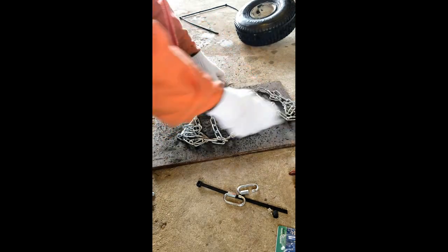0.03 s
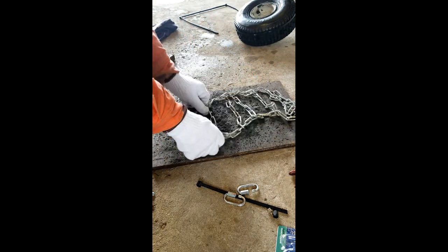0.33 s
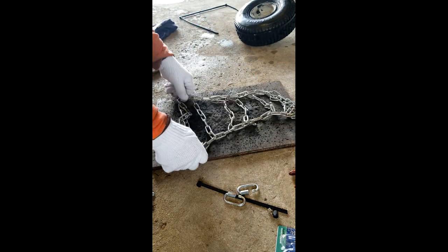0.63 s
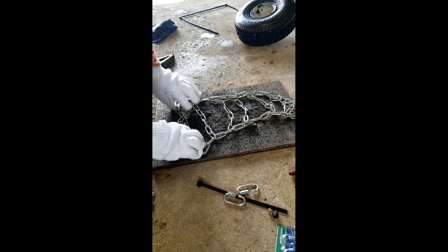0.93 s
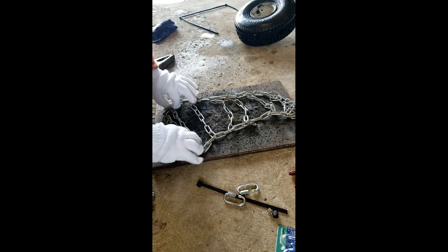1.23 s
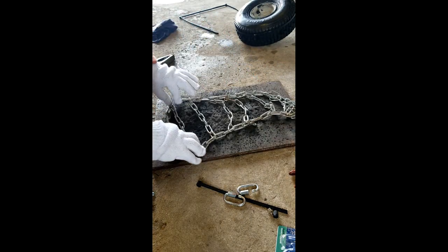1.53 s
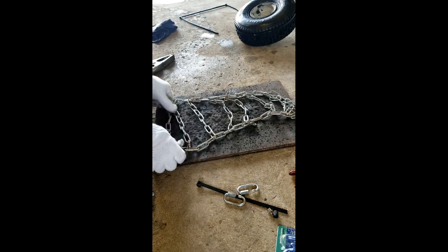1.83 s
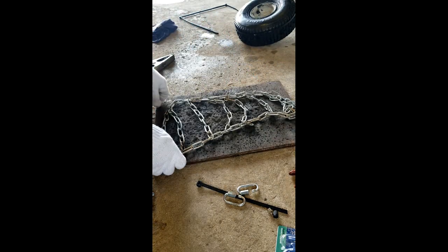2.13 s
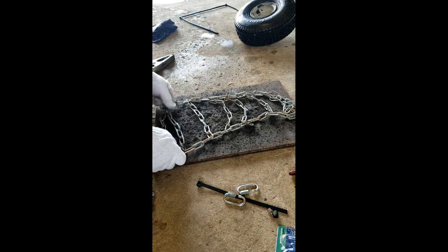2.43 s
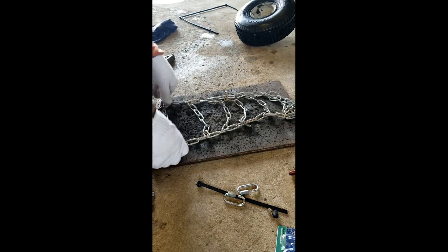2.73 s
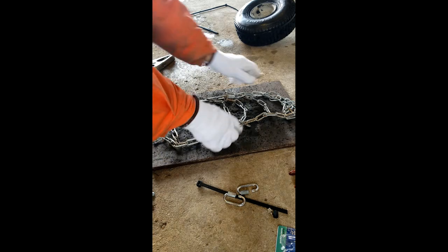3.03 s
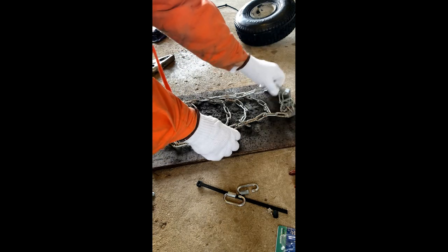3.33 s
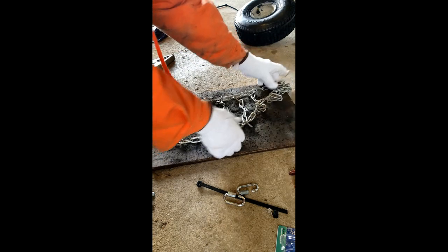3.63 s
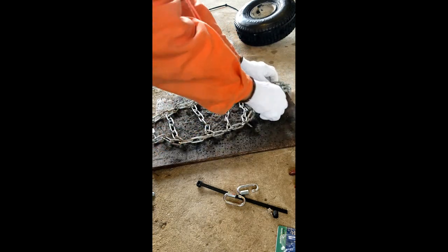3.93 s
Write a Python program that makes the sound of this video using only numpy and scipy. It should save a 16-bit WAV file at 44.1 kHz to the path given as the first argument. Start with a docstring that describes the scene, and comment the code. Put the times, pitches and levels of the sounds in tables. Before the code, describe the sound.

A metal chain clinks and clatters in short pulls across a wooden board.

```python
"""Steel links clink and clatter as gloved hands lay a tyre chain on a board, in eight short pulls.
Links knock dead on the wood, ring very high against each other and snap into their seats.
The board thuds softly under the hands, and the hard workshop answers the chain.
Underneath, sleeves rustle with each pull over the faint hush of still air."""
import sys
import numpy as np
from scipy import signal
from scipy.fft import rfft, irfft
from scipy.io import wavfile
from scipy.ndimage import uniform_filter1d

SR = 44100
rng = np.random.default_rng(int(sys.argv[2]) if len(sys.argv) > 2 else 0)


def generate_wav(sig):
    """Save sig (samples, or channels by samples) to the path in sys.argv[1] as 16-bit PCM at SR."""
    pcm = np.round(np.clip(np.atleast_2d(sig).T, -1, 1) * 32767).astype(np.int16)
    wavfile.write(sys.argv[1], SR, pcm)


N = 176400

# bright crack of steel on wood (frequency [Hz], gain [dB])
CRACK_EQ = [(1500, -28.5), (3000, -2.5), (3700, -1), (4400, 0), (5500, -2), (6200, -6), (7400, -15),
            (9000, -35.5), (16000, -31)]
# links landing on the board (time [s], level [dB], centre pitch [Hz], crack against body [dB])
KNOCK_CUES = [(0.277, -33, 1270, 1.5), (0.382, -23, 1550, -10), (0.446, -28, 1420, -32),
              (0.508, -26.5, 930, -38), (0.642, -34, 1270, -35), (0.662, -28, 1070, -15),
              (0.858, -36, 1540, -6), (0.894, -28.5, 1040, -37), (1.008, -32.5, 2330, -9),
              (1.039, -22, 1550, -40), (1.066, -19.5, 1340, -42), (1.108, -28.5, 1350, -39),
              (1.134, -24.5, 1470, -12), (1.164, -22.5, 1850, -36), (1.196, -29, 1380, -14),
              (1.236, -32, 1340, 0.5), (1.501, -25, 1500, -31), (1.531, -41, 1300, -9),
              (1.567, -24.5, 2250, -26.5), (1.578, -25, 1700, 1.5), (1.597, -20, 2560, 4.5),
              (1.835, -25, 1936, -11.5), (1.889, -20, 1573, -13), (2.109, -32.5, 1230, 1.5),
              (2.169, -36.5, 1150, -27.5), (2.245, -23.5, 1268, -41), (2.261, -32, 1550, -22),
              (2.376, -36.5, 1035, -10.5), (2.468, -33.5, 1250, -27.5), (2.575, -22, 2360, -29.5),
              (2.59, -8, 2624, -7.5), (2.605, -17.5, 1087, -14), (2.644, -16.5, 2200, -16),
              (2.65, -11.5, 2330, -10), (2.775, -21, 1500, -13), (3.15, -31.5, 1570, -16.5),
              (3.166, -28.5, 1587, -4), (3.194, -29.5, 2500, -33.5), (3.218, -25, 1700, -21.5),
              (3.3, -27.5, 2340, -21), (3.336, -23.5, 2680, -25.5), (3.348, -17.5, 2430, -20),
              (3.358, -21, 1100, -7), (3.387, -26, 1420, -1.5), (3.406, -11, 2400, -24.5),
              (3.43, -18.5, 2710, -1), (3.436, -8.5, 2270, -11.5), (3.959, -24, 1560, -9.5)]
def knocks():
    """A link lands and bounces once: a dead knock and a bright crack; the hardest shake the board."""
    out = np.zeros((2, N))
    contact_s, trim_db = 0.0008, 2.5
    boom_hz, boom_q, boom_db, boom_above_db = 439, 2.8, -28.5, -9.5
    for start, db, hz, crack_db in KNOCK_CUES:
        bounce_s = 0.003 * (0.5 + rng.random())
        for delay_s, drop_db in ((0, 0), (bounce_s, -12)):
            blow = 0.27 * burst(decay_s=0.0035, likeness=0.58)
            blow[:, 0] += 1  # a clean impulse leads the grit
            body = unit_peak(board(blow, hz))
            crack = unit_peak(colour(burst(decay_s=0.0027, likeness=0.069), CRACK_EQ))
            knock = body + undb(crack_db) * crack
            if db > boom_above_db:
                boom = resonate(resonate(blow, boom_hz, boom_q), boom_hz, boom_q)
                knock += undb(boom_db) * boom / abs(boom).max()
            add(out, start + contact_s + delay_s, undb(db + trim_db + drop_db) * knock)
    return out


# woody tone of the board (frequency [Hz], gain [dB])
BOARD_EQ = [(100, -14), (250, -15.5), (400, -10.5), (630, -4.5), (780, -10.5), (980, -2), (1200, -6.5),
            (1420, -0.5), (1900, -8.5), (2400, -5.5), (3000, -13), (3400, -8.5), (3800, -20), (5000, -25),
            (7200, -10), (8800, -28.5), (16000, -38)]
def board(blow, hz, q=1.183):
    """The board's dead response to a blow, focused around hz."""
    body = colour(blow, BOARD_EQ)
    return undb(-12) * body + resonate(resonate(body, hz, q), hz, q / 2)


# clatter tone per pull; dropped chain is brighter than dragged chain (centre pitch [Hz])
PULL_PITCHES = [1295, 1210, 1190, 1444, 1090, 1700, 2030, 1585]
# fader moves, one list per pull (time [s], clatter level [dB], jingle level [dB])
PULL_FADERS = [
    [(.185, -65.5, -76), (.27, -60, -49), (.31, -51, -45.5), (.49, -43.5, -44), (.54, -55, -51),
     (.63, -59, -67), (.69, -46, -46), (.73, -64, -69)],
    [(.857, -53.5, -62), (.92, -46.5, -46.5), (.99, -50.5, -51.5), (1.04, -48.5, -48), (1.24, -46.5, -40.5),
     (1.29, -51.5, -45)],
    [(1.37, -51.5, -60), (1.47, -56, -75), (1.5, -42, -42.5), (1.565, -50.5, -48.5), (1.61, -38.5, -32),
     (1.64, -66, -62)],
    [(1.772, -54.5, -49), (1.81, -56.5, -53), (1.87, -49, -53), (1.93, -49.5, -54), (2.01, -57.5, -56.5),
     (2.04, -58.5, -63.5)],
    [(2.11, -55, -54.5), (2.22, -61.5, -53), (2.29, -43.5, -45.5), (2.33, -57, -78), (2.4, -51, -49),
     (2.5, -63.5, -72), (2.6, -43, -47.5)],
    [(2.578, -35.5, -34), (2.61, -38, -49.5), (2.645, -37, -31.5), (2.68, -73.5, -68), (2.755, -58.5, -51),
     (2.785, -43, -34), (2.85, -61.5, -59), (3.01, -62.5, -89.5)],
    [(3.12, -54.5, -76), (3.17, -50.5, -32.5), (3.26, -48, -45.5), (3.35, -39.5, -28), (3.4, -42, -36),
     (3.46, -32, -25.5), (3.53, -59, -49.5), (3.6, -67, -78.5)],
    [(3.82, -70, -98), (3.86, -51, -50.5), (3.93, -49.5, -46), (4.05, -39, -37)],
]
def clatter():
    """Many small knocks as the chain drags over the board, from links of low to high pitch."""
    out = np.zeros((2, N))
    spread_octaves, scrape_db = 1.103, -11.5
    for pull, centre_hz in zip(PULL_FADERS, PULL_PITCHES):
        links = contacts(pull, column=1, per_s=480, spread_db=4.5, count=12, at_once=12)
        pitches = centre_hz * 2 ** (spread_octaves * np.linspace(-1, 1, len(links)))
        for hits, hz in zip(links, pitches):
            knock = unit_energy(board(burst(decay_s=0.0019, likeness=0.58), hz))
            scrape = unit_energy(colour(burst(decay_s=0.0032, likeness=0.051), CRACK_EQ))
            add(out, pull[0][0], convolve(hits, knock + undb(scrape_db) * scrape))
    return undb(3.5) * out


def jingle():
    """Links jostle and ring, a few at a time, as each pull runs along the chain."""
    out = np.zeros((2, N))
    for pull in PULL_FADERS:
        for hits in contacts(pull, column=2, per_s=260, spread_db=5.5, count=16, at_once=4):
            add(out, pull[0][0], convolve(hits, link()))
    return undb(4) * out


SETTLE_S = 0.029
def contacts(pull, column, per_s, spread_db, count, at_once):
    """Random impacts ride one fader of a pull, running along count links, at_once at a time."""
    pull = np.array(pull)
    length_s = pull[-1, 0] - pull[0, 0]
    jitter, which, force = rng.random((1500, 3))[:int(per_s * length_s)].T
    t = (np.arange(len(jitter)) + 2 * jitter) / per_s % length_s
    accent_db = spread_db * np.minimum(-np.log(1 - force), 3)  # many soft hits, a few hard ones
    strength = unit_rms(undb(accent_db)) * np.sqrt(SR / per_s)
    settle = np.clip((length_s - t) / SETTLE_S, 0, 1)
    fader = undb(np.interp(pull[0, 0] + t, pull[:, 0], pull[:, column]))
    struck = (count * t / length_s + at_once * which).astype(int) % count
    hits = np.zeros((count, SR))
    hits[struck, (t * SR).astype(int)] = strength * settle * fader
    return hits


# link striking link (time [s], level [dB], leading pitch [Hz])
CLINK_CUES = [(0.229, -19.5, 11600), (0.275, -26.5, 11920), (0.476, -12.5, 12270), (0.493, -18, 13500),
              (0.679, -33, 12140), (0.91, -27, 12330), (1.069, -24, 11760), (1.19, -24.5, 13300),
              (1.215, -23.5, 12130), (1.476, -24, 11825), (1.597, -15, 11460), (1.606, -29, 12100),
              (2.275, -24, 11840), (2.343, -25, 13250), (2.535, -29, 11900), (2.645, -29, 9600),
              (2.65, -13.5, 14520), (2.745, -27.5, 10530), (2.78, -17, 12180), (3.169, -35, 11700),
              (3.266, -14.5, 11640), (3.348, -23, 11950), (3.428, -22, 9840), (3.44, -12.5, 13360),
              (3.465, -6.5, 11910), (3.553, -38, 9900)]
def clinks():
    """A link swings free against its neighbour and sings out at a pitch of its own."""
    out = np.zeros((2, N))
    rise_s, trim_db = 0.0056, -7.5
    for start, db, hz in CLINK_CUES:
        ring = unit_energy(mode(hz, t60=0.093)) + undb(2) * link()
        ring *= 1 - np.exp(-seconds(ring.shape[1]) / rise_s)
        add(out, start, undb(db + trim_db) * ring / abs(ring).max())
    return out


# glassy top of a steel tick (frequency [Hz], gain [dB])
STEEL_EQ = [(6000, -24.5), (9200, -24), (10800, -12.5), (12100, 1.5), (12750, -6.5), (13250, 2),
            (13900, -6.5), (14500, -10.5), (16000, -19.5)]
# ring of a typical link (frequency [Hz], level [dB], t60 [s])
LINK_MODES = [(10220, -17, .11), (11150, -14.5, .09), (11796, 0, .15), (12020, 5.5, 0.1), (12980, 0, 0.097),
              (13870, -13.5, .09), (14560, -7.5, 0.12)]
def link():
    """One struck link: a faint tick and high modes; pitch, balance and damping vary by link."""
    detune, strike_spread_db = 0.0081, 5.5
    damping = np.exp(0.37 * np.clip(rng.standard_normal(), -0.2, 2))
    ring = 0
    for hz, db, t60 in LINK_MODES:
        gain = undb(db + strike_spread_db * rng.standard_normal())
        ring += gain * mode(hz * (1 + detune * rng.standard_normal()), t60 / damping)
    ring = unit_energy(ring)
    tick = unit_energy(colour(burst(decay_s=0.006, likeness=0), STEEL_EQ))
    add(ring[:, :tick.shape[1]], 0, undb(-5) * tick)
    return unit_energy(ring)


# links seating (time [s], level [dB])
SNAP_CUES = [(0.857, -39), (1.219, -18), (1.475, -38), (1.771, -38), (2.11, -40), (2.342, -29.5),
             (3.004, -38.5), (3.2225, -11.5)]
def snaps():
    """A link slips into its seat with a dry, very bright tick."""
    out = np.zeros((2, N))
    for start, db in SNAP_CUES:
        tick = colour(burst(decay_s=0.0018, likeness=0), STEEL_EQ)
        add(out, start, undb(db) * unit_peak(tick))
    return out


# hands landing on the board (time [s], level [dB])
THUD_CUES = [(0.29, -59), (0.412, -60), (0.662, -54), (0.89, -53), (0.958, -46), (1.149, -51.5),
             (1.511, -49), (1.581, -53), (1.933, -51), (2.362, -52), (2.6, -48), (2.658, -48.5),
             (2.761, -53), (3.126, -42), (3.572, -46.5)]
def thuds():
    """The board booms low under the hands, over a faint wavering rumble."""
    board_hz, rise_s, rumble_db = 74.7, 0.019, -67
    rumble = resonate(resonate(rng.standard_normal(N), board_hz, q=1.8), board_hz, q=0.9)
    fade_in = np.clip(seconds(N) / THUD_CUES[0][0], 0.2, 1)
    out = undb(rumble_db) * unit_rms(rumble) * fade_in
    t = seconds(16000)
    swell = t / rise_s * np.exp(1 - t / rise_s)
    for start, db in THUD_CUES:
        hz = board_hz * (1 + 0.029 * rng.standard_normal())
        add(out, start, undb(db) * swell * np.sin(2 * np.pi * hz * t))
    return out


# reverb time of the workshop (frequency [Hz], t60 [s])
WORKSHOP_DECAY = [(200, 0.78), (1500, 0.35), (5000, 0.31), (12000, 0.29)]
def workshop(x):
    """Quick reflections off the floor, then a diffuse tail that dies sooner in the treble."""
    onset_s, early_decay_s, right_lift_db = 0.00078, 0.028, 4.5
    t = seconds(40000)
    hz, when, spectrum = signal.stft(rng.standard_normal((2, len(t))), SR)
    fade = np.exp(-np.log(1000) * when / along_hz(WORKSHOP_DECAY, hz)[:, None])
    tail = signal.istft(spectrum * fade, SR)[1][:, :len(t)] * (1 - np.exp(-t / onset_s))
    early = rng.standard_normal((2, len(t))) * np.exp(-t / early_decay_s) * (t > 0.002)
    response = undb(-10) * unit_energy(tail) + undb(-7) * unit_energy(early)
    return convolve(x.mean(axis=0), response) * undb([[0], [right_lift_db]])


# soft cloth noise (frequency [Hz], gain [dB])
SLEEVE_EQ = [(60, -6), (160, 0), (300, 0.5), (600, 1.5), (1500, -3), (4000, -7), (7200, -7.5),
             (9000, -11.5), (16000, -16.5)]
def sleeves():
    """Sleeves rustle with each pull and only faintly in between."""
    follow = 0.69  # dB of rustle per dB of clatter
    t = seconds(N)
    effort = sum(np.interp(t, pull[:, 0], undb(follow * pull[:, 1]), left=0, right=0)
                 for pull in map(np.array, PULL_FADERS))
    effort = unit_rms(uniform_filter1d(effort, size=2000))
    resting = 0.36 * np.clip((t - PULL_FADERS[0][0][0]) / SETTLE_S, 0, 1)
    return undb(-62.5) * (effort + resting) * noise_bed(SLEEVE_EQ)


# room tone with a low bump (frequency [Hz], gain [dB])
AIR_EQ = [(25, -15.5), (70, 4.5), (150, -15), (400, -12.5), (1000, -12.5), (2500, -14.5), (7000, -17.5),
          (9000, -22), (16000, -19.5)]
def air():
    """The steady hush of still workshop air."""
    return undb(-74.5) * noise_bed(AIR_EQ)


def noise_bed(eq):
    """Coloured noise at rms 1, partly shared by both channels."""
    return unit_rms(colour(rng.standard_normal((2, N)) + rng.standard_normal(N), eq))


def burst(decay_s, likeness):
    """A brief crackle of contact; likeness is the correlation of left and right."""
    t = seconds(2048)
    left, other = rng.standard_normal((2, len(t)))
    right = likeness * left + np.sqrt(1 - likeness ** 2) * other
    return np.array([left, right]) * np.exp(-t / decay_s)


def mode(hz, t60):
    """One fading partial that reaches left and right in different phases."""
    t = seconds(11000)
    phase = 2 * np.pi * rng.random() + np.pi * rng.random((2, 1))
    return np.exp(-np.log(1000) * t / t60) * np.sin(2 * np.pi * hz * t + phase)


def colour(x, eq, size=4096):
    """Minimum-phase filter with the given EQ curve."""
    gain = undb(along_hz(eq, np.linspace(0, SR / 2, size // 2 + 1)))
    cepstrum = irfft(np.log(gain))
    cepstrum[1:size // 2] *= 2
    cepstrum[size // 2 + 1:] = 0
    return convolve(x, irfft(np.exp(rfft(cepstrum))))


def along_hz(points, hz):
    """Reads a table on a log-frequency axis."""
    frequencies, values = np.array(points).T
    return np.interp(np.log(hz + 1), np.log(frequencies), values)


def resonate(x, hz, q):
    return signal.lfilter(*signal.iirpeak(hz, q, fs=SR), x)


def convolve(x, response):
    return signal.fftconvolve(np.atleast_2d(x), np.atleast_2d(response), axes=-1)[:, :x.shape[-1]]


def add(out, start_s, x):
    i = int(start_s * SR)
    out[..., i:i + x.shape[-1]] += x[..., :N - i]


def seconds(samples):
    return np.arange(samples) / SR


def undb(db):
    return 10 ** (np.asarray(db) / 20)


def unit_rms(x):
    return x / np.sqrt(np.mean(x ** 2))


def unit_peak(x):
    """Scaled so the left channel peaks at 1."""
    return x / abs(x[0]).max()


def unit_energy(x):
    """Each channel scaled to energy 1."""
    return x / np.sqrt(np.sum(x ** 2, axis=-1, keepdims=True))


# shading of the right microphone, which faces away from the chain (frequency [Hz], gain [dB])
OFF_AXIS_EQ = [(150, -4.5), (500, -5.5), (1100, -11), (2300, -11), (4500, -11), (8500, -20), (13000, -3.5)]
def scene():
    """The chain and its reverb sit to the left, over thuds, air and sleeves."""
    chain = knocks() + clatter() + jingle() + clinks() + snaps()
    left, right = chain + workshop(chain)
    return np.array([left, colour(right, OFF_AXIS_EQ)[0]]) + thuds() + air() + sleeves()


def record(dry):
    """The recorder thins the deep bass and cuts the very top."""
    low_cut_hz, top_hz = 49.3, 15700
    thinned = signal.sosfilt(signal.butter(2, low_cut_hz, "highpass", fs=SR, output="sos"), dry)
    return signal.sosfilt(signal.ellip(10, 0.2, 80, top_hz, fs=SR, output="sos"), thinned)


dry = scene()
out = record(dry)
generate_wav(out)
```